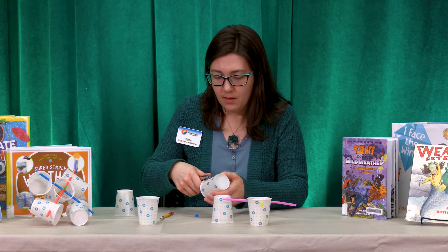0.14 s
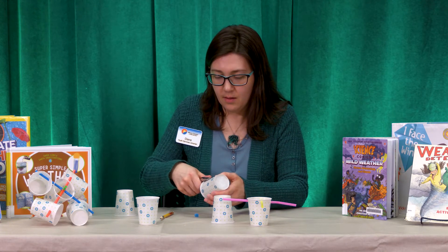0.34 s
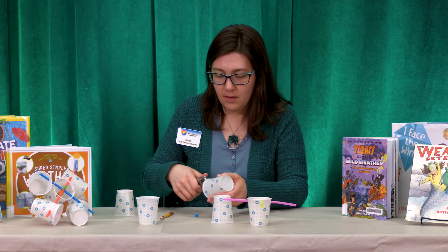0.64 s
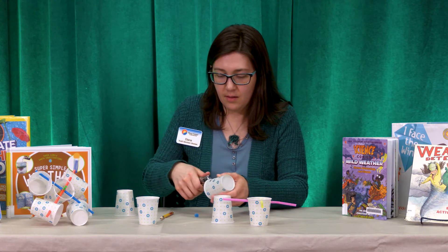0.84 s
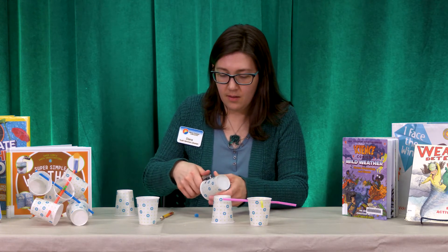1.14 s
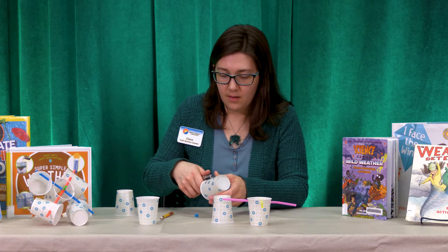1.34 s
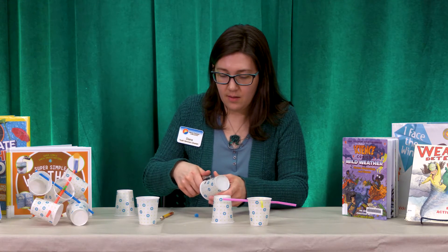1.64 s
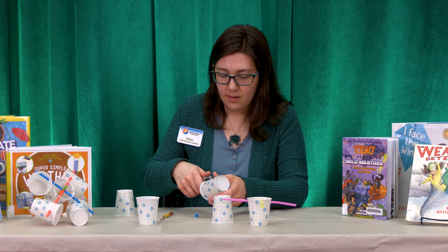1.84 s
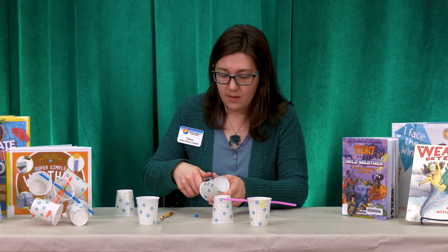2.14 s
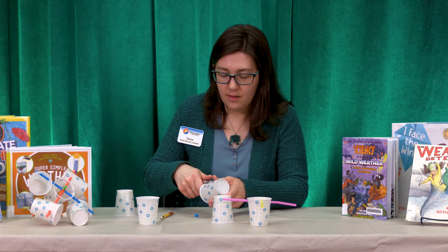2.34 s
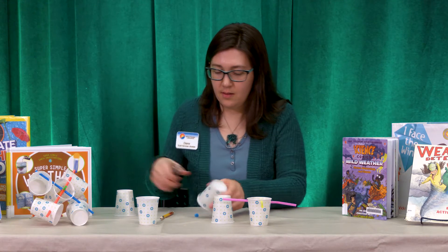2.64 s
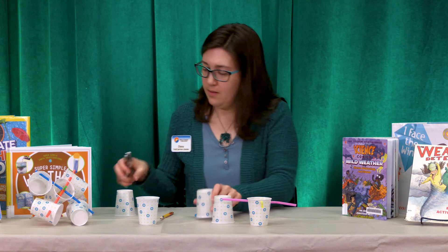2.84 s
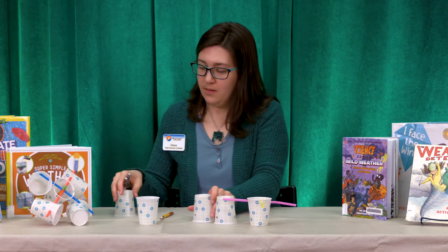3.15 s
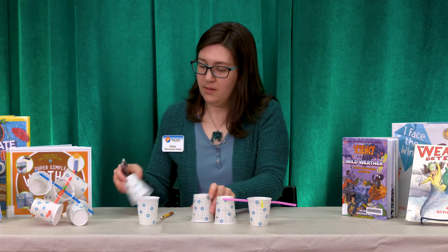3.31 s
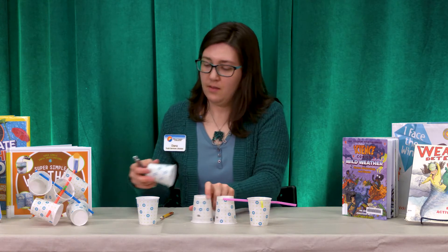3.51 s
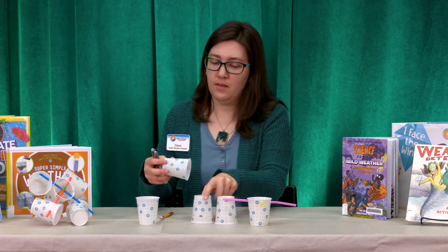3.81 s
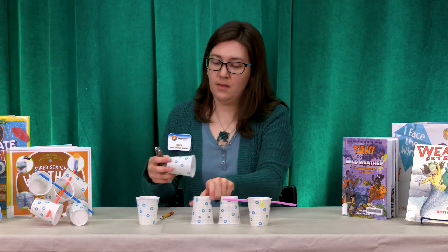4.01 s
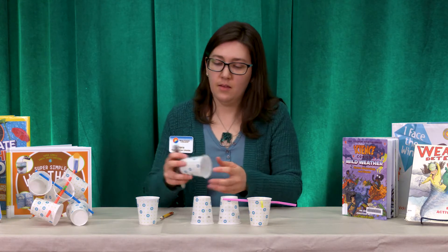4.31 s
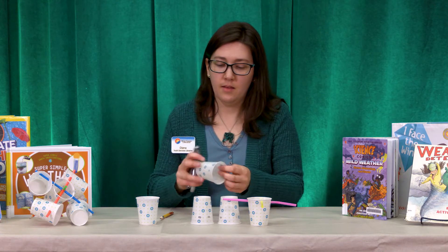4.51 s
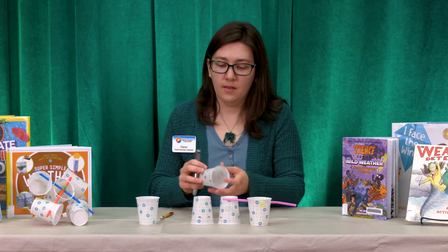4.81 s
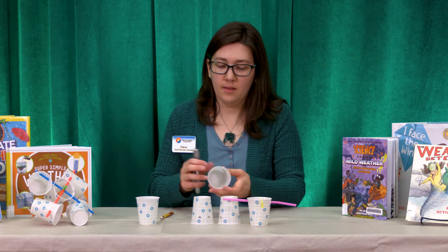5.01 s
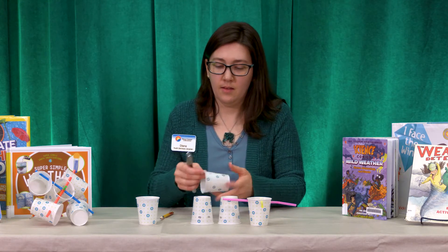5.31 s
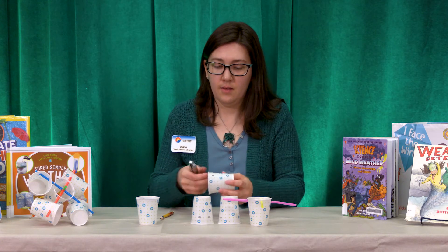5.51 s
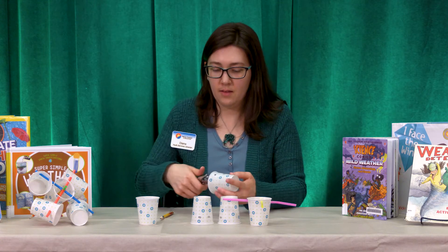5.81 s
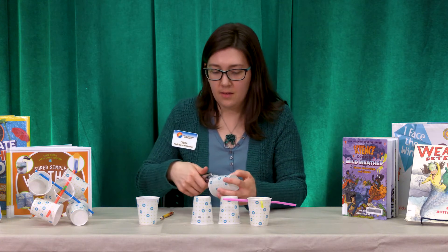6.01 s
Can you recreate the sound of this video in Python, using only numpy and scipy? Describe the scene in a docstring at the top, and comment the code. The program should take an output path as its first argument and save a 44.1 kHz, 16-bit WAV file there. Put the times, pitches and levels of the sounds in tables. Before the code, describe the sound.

A quiet room with soft ventilation and a faint low wavering hum, heard through a close microphone. At about 0.3 s a small pre-crack leads into a very loud, hard punch snap at 0.36 s, steel and paper ringing briefly with a short room tail. Dry, slightly hollow ticks and papery slips cluster at 0.5-0.6 s, then at 0.8, 0.9 and 1.05 s, with sparse small clicks until 2.15 s. A second equally loud snap lands at 2.3 s, followed by crisp ticks and a scrape near 2.5 s. Cups slide and knock hollowly on the covered table around 2.9-3.3 s, strongest at 3.2; a softer slide follows at 3.5-3.7 s, then another scrape with a firm knock at 3.95-4.1 s. From 4.3 to 5.9 s a paper cup rustles gently in the fingers, with tiny crease pops and ticks. A brighter click comes at 6.0 s.

```python
"""A quiet, humming room: a hand hole punch snaps twice through a paper cup close to a microphone.
Snaps and ticks are dense contact bursts through colour filters, plus decaying body modes.
Cups knock (modes, taps, a shudder) and slide on a covered table; another is turned in the fingers.
Rubbing and sliding are grainy noise under level curves, with crease pops in the rubbing.
Ventilation noise, two wavering tones, a ceiling echo and diffuse reverberation surround them."""
import sys
import numpy as np
from scipy import signal
from scipy.fft import rfft, irfft
from scipy.io import wavfile
from scipy.ndimage import map_coordinates

SR = 44100
rng = np.random.default_rng(int(sys.argv[2]) if len(sys.argv) > 2 else 0)


def master_out(mix):
    """Clip the mix to full scale and print it as 16-bit PCM to the path in sys.argv[1]."""
    frames = np.transpose(np.atleast_2d(mix))
    ceiling = np.clip(frames, -1, 1)
    pcm = np.round(ceiling * 32767).astype(np.int16)
    wavfile.write(sys.argv[1], SR, pcm)


N = 271656
TIME_S = np.arange(N) / SR

# All levels in the tables are relative unless noted.
# ventilation spectrum: (frequency [Hz], level [dB])
AIR_COLOUR = [(20, -28.5), (45, -28), (70, -18), (110, -8.5), (180, -5.5), (300, -11.5), (1000, -22.5),
              (1500, -25), (4000, -29), (10000, -31.5), (13000, -35.5), (16000, -48)]
# duct tones: (frequency [Hz], rms level [dB re full scale], wander rate [1/s])
DUCT_TONES = [(191.4, -68.5, 5.9), (132.3, -76, 11)]
# reverberation: (frequency [Hz], level [dB], t60 [s])
ROOM_DECAY = [(249.54, -6, 0.23), (550, -2, 0.69), (1000, 1, 0.27), (2000, -2.5, 0.49), (4000, -1.5, 0.25),
              (8000, -2.5, 0.29), (15000, -6, 0.15)]
# push behind each of three slides: (time [s], level [dB])
SLIDE_PUSHES = [
    [(2.915, -88), (2.927, -63), (2.933, -62.5), (2.961, -70), (3.167, -64), (3.203, -51), (3.26, -81)],
    [(3.47, -88), (3.478, -72.5), (3.502, -62.5), (3.576, -58.5), (3.588, -61.5), (3.706, -73),
     (3.74, -84.5)],
    [(3.91, -107.5), (3.922, -60), (3.954, -49.5), (3.96, -54), (4.032, -55), (4.114, -78), (4.125, -88)],
]
# air inside a sliding cup: (frequency [Hz], level [dB])
DRONE_COLOUR = [(160, -48), (280, -12), (517, 0), (609, -0.5), (687, -0.5), (1020, -5), (1210, -11),
                (1450, -11.5), (1760, -27.5), (2200, -25), (2860, -70.5), (4840, -120)]
# paper on the table cover: (frequency [Hz], level [dB])
FRICTION_COLOUR = [(1060, -35.5), (1800, -8.5), (3140, -2.5), (3480, -1.5), (4250, -4.5), (4700, -2),
                   (7290, -6.5), (11700, -9), (15000, -23), (16000, -63)]
# cups knock on the table:
# (time [s], level [dB], brightness [dB/octave], share of free ring time [1], pitch ratio [1])
KNOCKS = [(3.186, -20, 1.5, 0.39, 1.22), (3.2, -21.5, 2.5, 0.95, 1.003), (3.257, -36, 1.5, 0.78, 1.11),
          (3.346, -47, 17, 0.98, 1), (3.513, -37, 6, 0.63, 1.24), (3.893, -50, 3, 0.57, 1.15),
          (3.9867, -18, 3, 0.27, 1.26)]
# cup on the table cover: (frequency [Hz], level [dB], free t60 [s])
KNOCK_MODES = [(301.7, -4, 0.05), (441, -1, 0.062), (555.5, 5, 0.035), (564, 5, 0.04), (870, -5, 0.014),
               (1070, -16.5, 0.013), (1220, -18.5, 0.051)]
# paper slips past jaws or fingertip: (start [s], length [s], level [dB], brightness [dB])
SLIPS = [(.499, 0.035, -46, -1.5), (0.551, 0.048, -56, -3), (1.007, 0.026, -64, -7),
         (1.059, 0.089, -63, -1), (1.848, 0.011, -69, -2), (2.257, .019, -65, 6), (2.471, 0.034, -44, -1),
         (2.514, 0.016, -50.5, 3.5), (2.621, .032, -72, 5.5), (2.842, 0.037, -72.5, 4.5),
         (3.301, 0.05, -68, -16.5), (3.389, 0.042, -67.5, -9.5), (4.295, 0.0058, -47.5, 4.5),
         (4.55, 0.067, -61.5, 4.5), (4.641, 0.035, -61, 5.5), (4.727, 0.059, -65, -4),
         (4.91, 0.026, -63.5, -4), (5.233, 0.038, -57, 0), (5.303, 0.053, -55.5, 4.5),
         (5.397, 0.02, -68.5, 7.5), (5.513, 0.051, -60, 2.5), (5.64, 0.017, -57, 5),
         (5.716, 0.17, -67.5, 0.5)]
# rubbed cup body, wall and paper surface, one list each: (frequency [Hz], level [dB])
RUB_COLOURS = [
    [(300, -22.5), (700, -8), (1080, 1), (1300, -5), (1700, -10.5), (2500, -15), (5000, -27)],
    [(1500, -20.5), (3000, -8), (3950, -13), (4400, 0.5), (4800, -4.5), (5200, -4), (5950, -13), (6700, -5),
     (11000, -21.5)],
    [(4000, -32.5), (7000, -2), (7700, -4), (9200, 0.5), (10400, -5), (11400, -2.5), (13000, -12.5),
     (16000, -24)],
]
# steady rustle of a cup turning in the fingers: (time [s], level [dB])
TURNING = [(4.42, -83), (4.5, -74), (4.84, -76), (4.98, -70.5), (5.2, -77.5), (5.5, -75), (5.88, -78),
           (5.97, -90)]
# shell modes of a tapped cup: (multiple of cup pitch [1], level [dB], t60 [s])
CUP_MODES = [(.77, -8, .04), (0.999, 0, 0.035), (1.29, -10, 0.039)]
# jaws and paper rim tick: (time [s], level [dB], hollowness [dB], bright edge [dB],
# cup pitch [Hz], contact ring [Hz])
TICKS = [(0.0676, -52, -12, -11, 1970, 4880), (.4683, -35, -7.5, -5, 1027, 3830),
         (.5133, -35.5, -9, -4, 1000, 3700), (0.5246, -28.5, -2, -3.5, 1003, 5670),
         (0.5322, -27.5, -20, -11, 1020, 3550), (0.5973, -38, -3.5, -15, 1457, 3400),
         (.606, -40, -13, -12, 1460, 3800), (.777, -29.5, -3, -9, 1377, 4220),
         (.9106, -35, 2, -5.5, 1059, 4305), (.9185, -34.5, 0, -6, 1049, 5040),
         (1.053, -36, -11, -8.5, 1420, 3870), (1.1617, -43.5, 1.5, -10, 1000, 4000),
         (1.1711, -44.5, 1.5, -20, 1067, 3820), (1.589, -37, -18, -5.5, 1420, 3860),
         (2.143, -43, -21.5, -6, 1387, 6414), (2.4648, -40.5, -22, -0.5, 995, 6700),
         (2.4912, -33, -2.5, 0, 1270, 5360), (2.501, -27, -8.5, -11, 1434, 3930),
         (2.9849, -47, -0.5, -11, 1008, 2515), (3.4391, -45, -3.5, -15, 1245, 2750),
         (3.9515, -34.5, -1.5, -16, 1550, 4780), (4.2957, -48.5, 3, -0.5, 1089, 4890),
         (4.5622, -42, -1, -8.5, 1043, 4900), (4.585, -41.5, -8.5, -9, 1103, 5000),
         (4.7263, -53, -10, -6, 1310, 4200), (4.9711, -49.5, -7, -4.5, 1020, 4400),
         (5.3108, -42, -7.5, -7, 1250, 4625), (5.5197, -43.5, -17.5, -0.5, 1140, 6550),
         (6.0019, -30, -5, -18, 1758, 3584), (6.0886, -47, -7, -12, 1650, 3510)]
# crack, hollow body and bright edge of a tick: (frequency [Hz], level [dB])
CRACK_COLOUR = [(500, -31.5), (1800, -16), (2800, -6), (3700, -1.5), (4900, 0.5), (6100, -7), (7500, -12.5),
                (12000, -27)]
BODY_COLOUR = [(150, -24.5), (400, -7.5), (700, 0), (1060, -2.5), (1200, -7.5), (1380, -3), (1800, -6.5),
               (2500, -14.5), (5000, -34)]
EDGE_COLOUR = [(3000, -34), (5800, -14), (7300, 4.5), (9000, 2), (11000, -3), (13000, -15.5),
               (16000, -20.5)]
# pin breaks through the wall, then the jaws slam shut:
# (time [s], level [dB], chatter decay [s], ring level [dB])
SNAPS = [(0.3236, -21.5, 0.0023, 1), (0.3335, -35.5, .002, -16), (0.3584, -3.5, 0.004, -10),
         (2.2783, -24, 0.0046, -9), (2.3011, -3, 0.0038, -6)]
# direct sound of the chatter: (frequency [Hz], level [dB])
SNAP_COLOUR = [(59, -58), (100, -35), (461, -20), (950, -5.5), (1170, -13.5), (1450, 0.5), (1760, -10),
               (2800, -7.5), (3250, -3), (3860, -9), (5300, -7.5), (7450, -7), (8110, -10.5),
               (11200, -11.5), (16000, -27)]
# snap thrown into the room in all directions: (frequency [Hz], level [dB])
SNAP_SPREAD_COLOUR = [(250, -27), (500, -15.5), (700, -11), (860, -2), (1030, 3), (1230, -10.5),
                      (1410, -1.5), (1560, -8.5), (1730, -4), (2200, -12.5), (5000, -9.5), (9000, -12.5),
                      (15000, -26.5)]
# punched cup and steel jaws: (frequency [Hz], level [dB], t60 [s])
PUNCH_MODES = [(367, -12, 0.031), (860, -13.5, 0.034), (1000, -11, 0.017), (1389, -1.5, 0.099),
               (1530, -3.5, 0.015), (1790, -14.5, 0.044), (2320, -4.5, 0.028), (3300, -1.5, .018),
               (4900, -8, 0.038), (6920, -10.5, 0.019)]

AIR_RMS_DB = -70.5
CEILING_DELAY_S, CEILING_DB = 0.0177, -21.5
SLIDE_HISS_DB, SLIDE_DRONE_DB = 4.5, [4.5, 3, 4.5]  # over the push; drone of each slide
SETTLE_DB, SETTLE_DECAY_S = -23, 0.043  # shudder after a knock
RUB_BODY_DB, RUB_SCRAPE_DB, RUB_HISS_DB = -5, 0, -1.5  # at zero brightness
TURNING_BRIGHT_DB = -3.5
CREASES_PER_S, CREASE_DB = 22, 14
MOUTH_HZ, MOUTH_Q = 1050, 21  # air resonance of the open cup
PALM_DELAY_S, PALM_SHARE = 0.00064, 0.22  # typical delay; strength of the reflection
LOW_CUT_HZ, CUTOFF_HZ = 200, 15900


def from_db(db):
    """Decibels to gain."""
    return 10 ** (np.asarray(db) / 20)


def rms_one(x):
    """Scale to unit power."""
    return x / np.sqrt(np.mean(x ** 2) + 1e-20)


def at_hz(points, hz, axis=1):
    """Read a table column on a log-frequency axis."""
    table = np.array(points)
    return np.interp(np.log(np.maximum(hz, 1)), np.log(table[:, 0]), table[:, axis])


def add(out, time_s, sound):
    """Mix a sound in at its time."""
    i = round(time_s * SR)
    out[i:i + len(sound)] += sound[:N - i]


def coloured(x, colour, size=4096):
    """Minimum-phase filter with the given spectrum; white noise keeps its power."""
    hz = np.linspace(0, SR / 2, size // 2 + 1)
    cepstrum = irfft(np.log(from_db(at_hz(colour, hz))))
    # fold onto the causal side
    cepstrum[1:size // 2] *= 2
    cepstrum[size // 2 + 1:] = 0
    response = irfft(np.exp(rfft(cepstrum)))
    return signal.oaconvolve(x, response / np.linalg.norm(response))[:N]


def band_pass(x, low_hz, high_hz):
    """Band-pass filter."""
    sos = signal.butter(2, [low_hz, high_hz], "band", fs=SR, output="sos")
    return signal.sosfilt(sos, x)


def drift(knots_per_s):
    """Random curve of unit rms, linear between knots."""
    knots = rng.standard_normal(int(N / SR * knots_per_s) + 2)
    return rms_one(np.interp(TIME_S * knots_per_s, np.arange(len(knots)), knots))


def swell(curve):
    """Gain along a level curve; -140 dB outside it."""
    time_s, db = np.transpose(curve)
    return from_db(np.interp(TIME_S, time_s, db, left=-140, right=-140))


def ring(modes, tilt_db=0, size=12000):
    """Decaying sines of a struck body, tilted per octave about the median mode."""
    hz, db, t60_s = np.array(modes).T[:, :, None]
    t = TIME_S[:size]
    level_db = db + tilt_db * np.log2(hz / np.median(hz)) - 60 * t / t60_s
    signs = (-1) ** np.arange(len(hz))[:, None]
    return np.sum(from_db(level_db) * np.sin(2 * np.pi * hz * t) * signs, 0)


def chatter(decay_s, hold, size=1500):
    """Dense run of random-sign contacts; hold above 1 rounds the start and steepens the end."""
    envelope = np.exp(-(TIME_S[:size] / decay_s) ** hold)
    return envelope * rng.choice([-1, 1], size)


def friction(grain_db, grains_per_s, crackle=0.3):
    """Paper fibres catch and slip: noise in uneven grains, with sparse fibre snaps."""
    unevenness = np.clip(drift(grains_per_s), -2, 2)
    grains = rms_one(rng.standard_normal(N) * from_db(grain_db * unevenness))
    snapping = rms_one(rng.standard_normal(N) * (rng.random(N) < 90 / SR))  # 90 per s
    return rms_one(grains + crackle * snapping)


def ventilation():
    """Soft air noise and two duct tones that waver in amplitude and phase."""
    hum = np.zeros(N)
    for hz, db, wander_per_s in DUCT_TONES:
        phase = 2 * np.pi * hz * TIME_S
        in_phase = drift(wander_per_s) * np.cos(phase)
        quadrature = drift(wander_per_s) * np.sin(phase)
        hum += from_db(db) * (in_phase + quadrature)
    return hum + from_db(AIR_RMS_DB) * coloured(rng.standard_normal(N), AIR_COLOUR)


def room(x, onset_s, size=32768):
    """Diffuse reverberation: banded noise with a soft onset and a decay time per band."""
    t, response = TIME_S[:size], np.zeros(size)
    edges_hz = np.geomspace(150, 17000, 13)
    for low_hz, high_hz in zip(edges_hz, edges_hz[1:]):
        band = band_pass(rng.standard_normal(size), low_hz, high_hz)
        hz = np.sqrt(low_hz * high_hz)
        decay_db = at_hz(ROOM_DECAY, hz) - 60 * t / at_hz(ROOM_DECAY, hz, axis=2)
        response += band * from_db(decay_db)
    response *= 1 - np.exp(-(t / onset_s) ** 4)
    return signal.oaconvolve(x, response / np.linalg.norm(response))[:N]


def sliding():
    """A cup hisses over the cover and its air drones; both follow the push and catch on the weave."""
    pushes = np.array([swell(curve) for curve in SLIDE_PUSHES])
    drone = coloured(friction(grain_db=2, grains_per_s=200), DRONE_COLOUR)
    drone = from_db(SLIDE_DRONE_DB) @ pushes * drone
    hiss = coloured(friction(grain_db=2, grains_per_s=1000), FRICTION_COLOUR)
    hiss = from_db(SLIDE_HISS_DB) * pushes.sum(0) * hiss
    return (drone + hiss) * from_db(0.77 * drift(110))


def knocks():
    """A cup rim lands on the soft cover: low hollow modes, a papery tap, a settling shudder."""
    rings, taps, shudder = np.zeros((3, N))
    for time_s, db, tilt_db, free_share, pitch in KNOCKS:
        modes = np.array(KNOCK_MODES) * [pitch, 1, free_share]
        add(rings, time_s, from_db(db - 3.5) * ring(modes, tilt_db))
        add(taps, time_s, from_db(db - 26) * chatter(0.0034, hold=0.51))
        settle = chatter(SETTLE_DECAY_S, hold=0.98, size=12000)
        add(shudder, time_s, from_db(db + SETTLE_DB) * settle)
    return rings + coloured(taps, FRICTION_COLOUR) + coloured(shudder, DRONE_COLOUR)


def stroke(length_s, edge_s, size=14000):
    """Attack, hold and release of one slip, with exponential edges."""
    t = TIME_S[:size]
    attack = 1 - np.exp(-np.minimum(t, length_s) / edge_s)
    return attack * np.exp(-np.maximum(t - length_s, 0) / edge_s)


def drag(lean):
    """Gain of all rubbing; lean is -1 for the cup body, 0 for its wall, 1 for its surface."""
    slips = np.zeros(N)
    for time_s, length_s, db, bright_db in SLIPS:
        add(slips, time_s, from_db(db + lean * bright_db) * stroke(length_s, edge_s=0.0079))
    return np.hypot(slips, swell(TURNING) * from_db(lean * TURNING_BRIGHT_DB))


def creases(gain):
    """Tiny folds pop at random, as strongly as the paper is rubbed, and ring the open cup."""
    pops = np.zeros(N)
    for when, strength in rng.random((int(CREASES_PER_S * N / SR), 2)):
        add(pops, when * TIME_S[-1], strength * chatter(0.0012, hold=1.1, size=400))
    pops = from_db(CREASE_DB) * gain * pops
    cup = ring(np.array(CUP_MODES) * [MOUTH_HZ, 1, 1], size=3000)
    ringing = signal.oaconvolve(pops, cup / np.linalg.norm(cup))[:N]
    return coloured(pops, CRACK_COLOUR) + from_db(-9) * ringing


def rubbing():
    """Paper drags past steel and skin in jerks that drive the whole cup, with crease pops."""
    jerks = rms_one(from_db(2.0 * drift(60) + 2.7 * drift(450)))
    shares = from_db([RUB_BODY_DB, RUB_SCRAPE_DB, RUB_HISS_DB])
    scrape = np.zeros(N)
    for lean, colour, share in zip((-1, 0, 1), RUB_COLOURS, shares):
        layer = coloured(friction(grain_db=1.0, grains_per_s=890), colour)
        scrape += drag(lean) * share * layer
    return jerks * scrape + creases(drag(0))


def past_hand(x):
    """A reflection off the slowly moving hand ripples the spectrum."""
    delay_s = PALM_DELAY_S * from_db(drift(2.6))
    reflection = map_coordinates(x, [(TIME_S - delay_s) * SR], order=3)
    return (x + PALM_SHARE * reflection) / np.hypot(1, PALM_SHARE)


def ticks():
    """Light contacts: crack, brief ring, bright edge and a hollow cup answer pitched by the grip."""
    crack, body, edge, rings = np.zeros((4, N))
    for time_s, db, hollow_db, edge_db, cup_hz, contact_hz in TICKS:
        add(crack, time_s, from_db(db - 3) * chatter(0.0029, hold=0.98))
        add(body, time_s, from_db(db + hollow_db - 2) * chatter(0.002, hold=1.3))
        add(edge, time_s, from_db(db + edge_db + 3.5) * chatter(0.0022, hold=1.4))
        cup = ring(np.array(CUP_MODES) * [cup_hz, 1, 1], size=3000)
        add(rings, time_s, from_db(db + hollow_db - 2.5) * cup)
        add(rings, time_s, from_db(db - 1) * ring([(contact_hz, 0, 0.009)], size=3000))
    bursts = coloured(crack, CRACK_COLOUR) + coloured(body, BODY_COLOUR)
    return bursts + coloured(edge, EDGE_COLOUR) + rings


def punch():
    """Hard steel chatter rings cup wall and jaws; returns the near sound and the sound thrown out."""
    cracks, rings, blows = np.zeros((3, N))
    for time_s, db, decay_s, ring_db in SNAPS:
        crack = from_db(db + 1.5) * chatter(decay_s, hold=1.4)
        add(cracks, time_s, crack)
        add(blows, time_s, [np.linalg.norm(crack)])  # same energy in one sample
        add(rings, time_s, from_db(db + ring_db - 6.5) * ring(PUNCH_MODES))
    near = coloured(cracks, SNAP_COLOUR) + rings
    thrown = coloured(blows, SNAP_SPREAD_COLOUR) + from_db(-9) * rings
    return near, thrown


def scene():
    """Near sources pass through a low cut at the microphone; a ceiling echo, the room and ventilation join
    them."""
    table = knocks() + sliding()
    handling = ticks() + past_hand(rubbing())
    snaps, thrown = punch()
    low_cut = signal.butter(2, LOW_CUT_HZ, "high", fs=SR, output="sos")
    near = signal.sosfilt(low_cut, snaps + handling + table)
    ceiling = from_db(CEILING_DB) * np.interp(TIME_S - CEILING_DELAY_S, TIME_S, near, left=0)
    # the cup mouth points away and beams its hollow tone into the room
    mouth = signal.lfilter(*signal.iirpeak(MOUTH_HZ, MOUTH_Q, fs=SR), handling)
    send = from_db(-20.5) * thrown + from_db(-20) * handling
    send += from_db(-9.5) * mouth + from_db(-20.0) * table
    return (near + ceiling + room(send, onset_s=0.014) + ventilation())[None]


def record(dry):
    """The input clips at 0.95 of full scale; a steep low-pass then cuts the top."""
    low_pass = signal.ellip(10, 0.1, 80, CUTOFF_HZ, fs=SR, output="sos")
    return signal.sosfilt(low_pass, np.clip(dry, -0.95, 0.95))


dry = scene()
out = record(dry)
master_out(out)
```